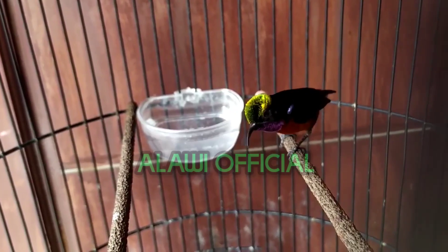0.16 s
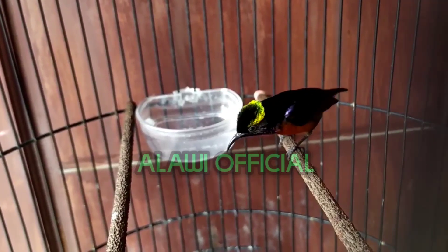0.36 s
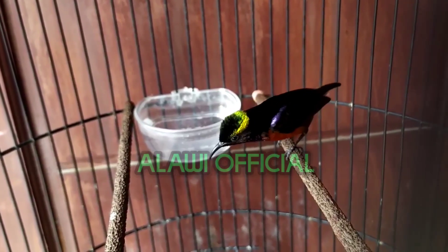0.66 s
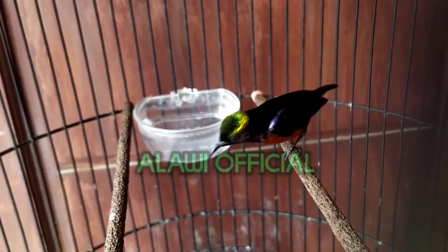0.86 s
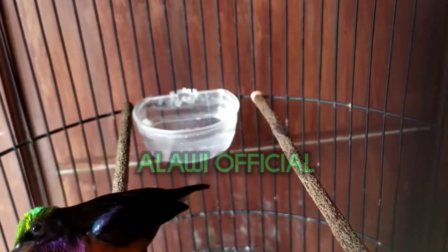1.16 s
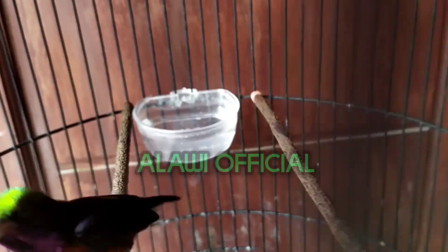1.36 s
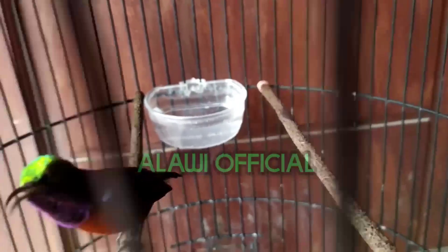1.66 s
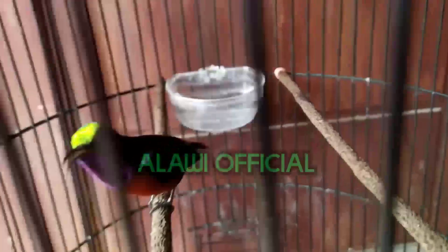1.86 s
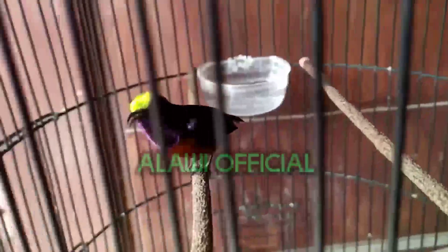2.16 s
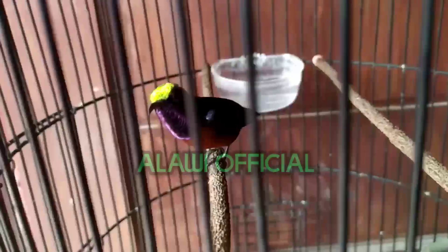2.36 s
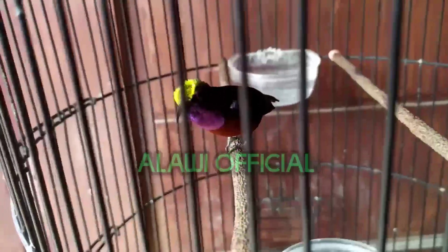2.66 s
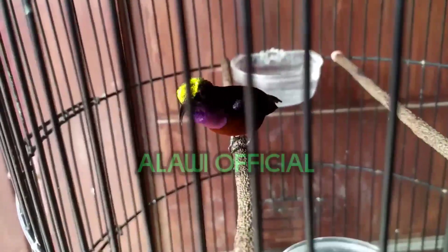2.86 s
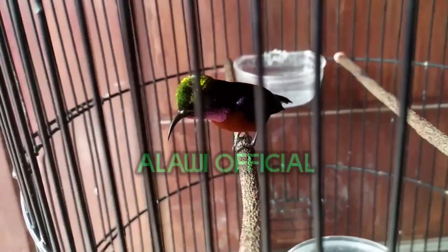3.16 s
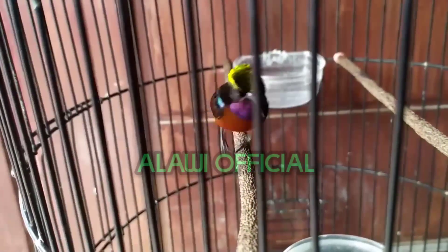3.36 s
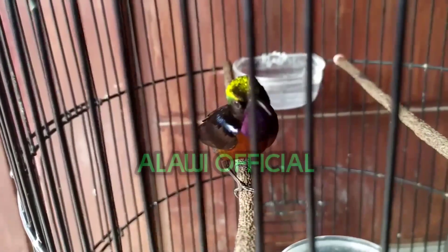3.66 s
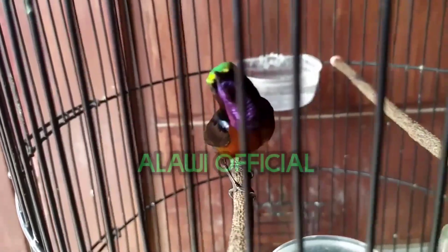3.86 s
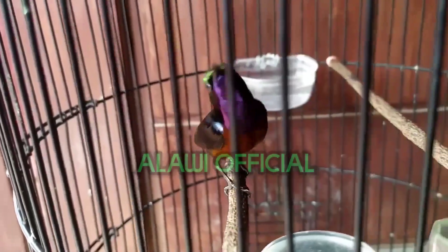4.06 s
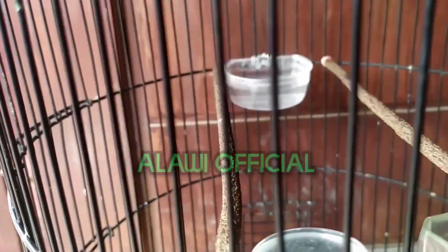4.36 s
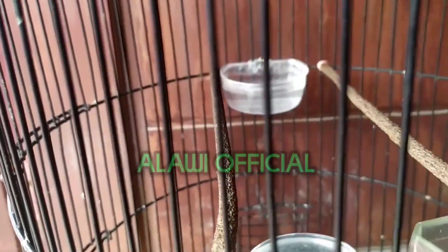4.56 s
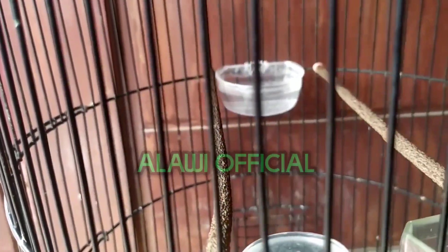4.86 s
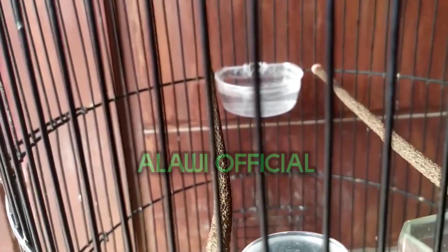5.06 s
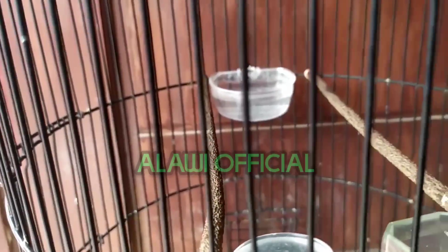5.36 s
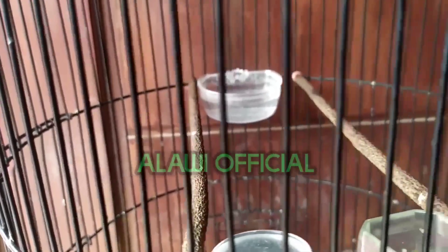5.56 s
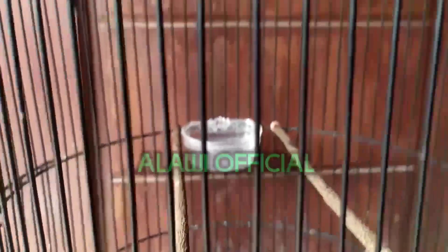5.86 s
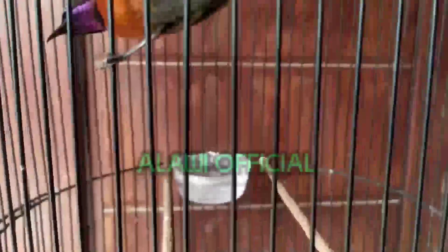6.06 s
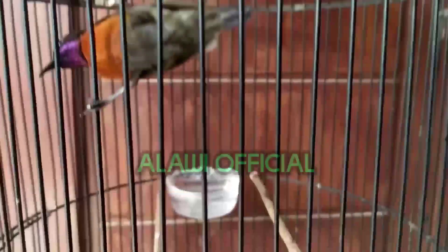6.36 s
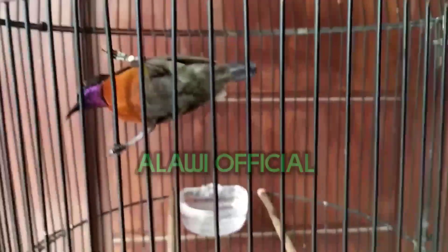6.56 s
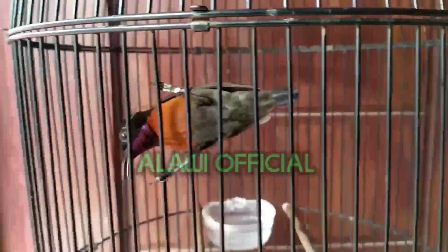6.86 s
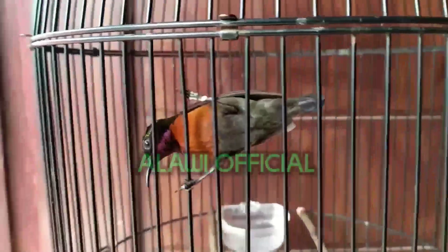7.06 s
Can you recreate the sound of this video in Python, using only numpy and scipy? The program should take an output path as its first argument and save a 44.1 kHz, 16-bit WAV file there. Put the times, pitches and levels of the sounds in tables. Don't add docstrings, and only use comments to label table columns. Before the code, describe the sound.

Sharp, overloaded bird chips and a rapid buzzy trill, then sparse single notes and soft perch taps over steady mains hum and rumble.

```python
import sys
import numpy as np
from scipy import signal
from scipy.io import wavfile
from scipy.ndimage import map_coordinates

SR = 44100
rng = np.random.default_rng(int(sys.argv[2]) if len(sys.argv) > 2 else 0)


def volts_from_db(level):
    exponent = np.asarray(level, float) / 20
    return 10 ** exponent


def materialize(psi):
    bounded = np.clip(np.atleast_2d(psi).T, -1, 1)
    quanta = np.round(bounded * 32767).astype(np.int16)
    wavfile.write(sys.argv[1], SR, quanta)


N = 318402
LEAD = SR // 4
TIME = (np.arange(N + LEAD) - LEAD) / SR

# (time [s], top pitch [Hz], leap up to it [Hz], level [dB])
CHIP_NOTES = [
    (-.12, 6180, 932, 3),
    (.379, 6795, 800, 7),
    (3.71, 6793, 1700, 6),
]
# (time [s], top pitch [Hz], leap up to it [Hz], level [dB])
RASP_NOTES = [
    (1.066, 6576, 960.4, 4.7),
    (6.961, 6185, 792.5, 3.5),
]
# (time [s], top pitch [Hz], level [dB])
TRILL_NOTES = [(1.162, 6148, 6), (1.230, 5990, 5.5), (1.294, 5990, 3), (1.357, 5918, 4), (1.420, 5833, 4),
               (1.481, 5860, 3.5), (1.549, 5922, 6), (1.614, 5960, 7), (1.683, 5827, 4), (1.753, 5993, 4),
               (1.820, 5980, 6), (1.889, 5890, 7), (1.958, 5915, 4.5), (2.025, 6024, 4), (2.100, 5996, 3.5),
               (2.169, 6050, 4), (2.245, 6025, 3)]
# (time [s], pitch [Hz], level [dB])
WHISTLE_CURVES = [
    [(2.995, 3925, -33), (3.028, 4202, 6), (3.05, 4247, 5.5), (3.088, 4326, 10), (3.111, 4244, 6.5),
     (3.122, 4140, -29)],
    [(4.974, 4360, -21), (4.99, 4120, 2.5), (5.002, 4287, 1), (5.024, 4180, 7), (5.062, 4298, 3.5),
     (5.074, 4200, 11), (5.1, 4158, 9), (5.106, 4010, -29)],
]
# (time [s], pitch [Hz], level [dB])
FAR_CALL_CURVE = [(5.09, 5420, -67), (5.12, 5350, -40), (5.15, 5300, -19), (5.165, 4940, -35),
                  (5.18, 4610, -17), (5.194, 4310, -51)]
# (time [s], level [dB])
HOARSENESS_CURVE = [(0, 1), (1.9, 0.5), (2.3, 4.5), (3.7, 4.5), (7, -1)]
# (time [s], left over right [dB], left lag [samples])
BIRD_POSITION = [(0, 0, 18), (.45, 15.5, 12.4), (1.08, 6, 13), (1.2, 8, 8.6), (1.35, 4.5, 8.66),
                 (1.75, 6.5, 9.76), (1.95, 5, 12.56), (2.3, 5.5, 14.35), (3.0, 11, 16.25), (3.15, 22, 17),
                 (3.73, 8, 10), (4.98, 10, 13.9), (5.1, 11, 13.8), (6.98, 6.5, 12.3)]
# (time [s], peak [dB], body pitch [Hz])
PERCH_KNOCKS = [
    (2.914, -30, 190),
    (4.282, -27.5, 95),
    (5.651, -29, 190),
    (6.604, -30, 170),
]
# (pitch [Hz], level [dB rms])
MAINS_LINES = [(60.2, -56), (120.6, -47.5), (241, -61.5), (300, -70.5), (361.5, -65.5), (482, -60.5)]
# (frequency [Hz], level [dB])
AIR_HISS = [(200, -19.5), (480, -16.5), (800, -14), (1200, -20), (2500, -19.5), (6900, -25.5),
            (9000, -15.5), (14500, -25)]
# (frequency [Hz], level [dB per Hz])
MACHINE_RUMBLE = [(26, -50), (45, -24.5), (64, 5.5), (92, -6.5), (125, -6), (200, -23)]
# (frequency [Hz], likeness [0-1])
PORT_LIKENESS = [(30, 1), (150, 0.62), (300, 0.74), (700, 0.11), (3000, .05), (16000, 0.017)]
# (time [s], level [dB])
MACHINE_NEARNESS = [(0, -2.5), (.9, 2), (4, -0.5), (5.3, -1), (7.22, -3.5)]
# (time [s], lift [dB])
HAND_SWAYS = [
    (2.78, 8),
    (3.3, 5),
    (3.92, 5),
]
# (time [s], level [dB])
CHATTER_LEVEL = [(.8, -57), (.93, -49), (1.05, -52), (1.3, -50), (4.55, -62), (4.75, -50.5), (4.95, -50.5),
                 (5.2, -77.5)]
# (time [s], level [dB rms])
MOTOR_LEVEL = [(0, -72), (4.5, -73), (6.4, -57), (7.22, -54.5)]


def unit_power(x):
    return x / np.sqrt(np.mean(x ** 2) + 1e-20)


def in_time(rows):
    s, *columns = np.transpose(rows)
    return [np.interp(TIME, s, column) for column in columns]


def at_hz(points, hz):
    point_hz, values = np.transpose(points)
    return np.interp(np.log(hz), np.log(point_hz), values)


def resonant_noise(hz, width_hz):
    r = np.exp(-np.pi * width_hz / SR)
    section = [0.96, 0.00027, -1, 1, -2 * r * np.cos(2 * np.pi * hz / SR), r * r]
    return unit_power(signal.sosfilt([section] * 2, rng.standard_normal(len(TIME))))


def drift(rate_hz):
    steps = rng.standard_normal(int(len(TIME) / SR * 40) + 2)
    return unit_power(np.interp(TIME * rate_hz, np.arange(len(steps)) - 10, steps))


def arches(notes, length_s, drop_hz, crest, rise_s, fall_s):
    hz = np.full(len(TIME), 5e3)
    gain, ragged = np.zeros((2, len(TIME)))
    for s, top_hz, leap_hz, db in notes:
        near = slice(*np.searchsorted(TIME, [s - .01, s + length_s + .005]))
        t = TIME[near] - s
        before = np.clip(1.3 - 1.3 * t / (crest * length_s), 0, 1)
        after = np.clip((t / length_s - crest) / (1 - crest), 0, 1.1)
        hz[near] = top_hz - leap_hz * before ** 2.7 - drop_hz * after ** 2.1
        rise_db = np.minimum(t / rise_s - 1, 0) * 15
        fall_db = np.minimum((length_s - t) / fall_s - 1, 0) * 13
        gain[near] = volts_from_db(db + (rise_db + fall_db))
        ragged[near] = np.minimum(before ** 6 + .6 * after ** 6, 1)
    return hz, gain, ragged


def syrinx(hz, gain, buzz, flaps, half_db, octave_db, beak_hz, twin_db=-60):
    wobble, flutter, waver = flaps
    phase = 2 * np.pi * np.cumsum(hz + 400 * buzz * wobble) / SR
    top_of_range = np.clip((hz - 6300) / 300, 0, 1)
    twin = volts_from_db(twin_db) * np.sin(2 * np.pi * 2600 * TIME) * top_of_range
    tone = gain * np.sin(phase) * (1 + buzz * flutter + twin)
    beak = signal.butter(3, beak_hz, "high", fs=SR, output="sos")
    tone = signal.sosfilt(beak, tone + 1e-18)
    half = volts_from_db(half_db) * np.sin(phase / 2) * (1 + .5 * waver)
    octave = volts_from_db(octave_db) * np.sin(2 * phase) * (.5 + waver)
    return tone + gain * (half + octave)


def membrane_flaps():
    return resonant_noise(349.3, 770), resonant_noise(500, 260), resonant_noise(120, 410)


def voice_break():
    return resonant_noise(6300, 3650)


def chips(flaps, hoarse_db):
    hz, gain, ragged = arches(CHIP_NOTES, .038, 2365, crest=.31, rise_s=.005, fall_s=.013)
    song = syrinx(hz, gain * (1 - .7 * ragged), 0.1 + .2 * ragged, flaps,
                  half_db=-50, octave_db=-28, beak_hz=3800, twin_db=hoarse_db - 13)
    return song, gain


def breath(hoarse_db, chip_gain, rasp_gain, trill_gain):
    hiss = resonant_noise(8330, 2330)
    sizzle = 0.059 * resonant_noise(12500, 5000) * volts_from_db(hoarse_db)
    throat = 0.13 * resonant_noise(2380, 1400)
    flow = volts_from_db(-20.0) * chip_gain + volts_from_db(-15.0) * rasp_gain + volts_from_db(-21) * trill_gain
    return volts_from_db(hoarse_db) * (hiss + sizzle + throat) * flow


def room(x):
    t60_s, tail_db, early_db = 0.54, -14.5, -14
    t = np.arange(SR // 2 + LEAD) / SR
    tail = rng.standard_normal((2, len(t))) * volts_from_db(-60 * t / t60_s) * np.clip(t / 0.004, 0, 1)
    tail *= volts_from_db(tail_db) / np.sqrt(np.mean(np.sum(tail ** 2, axis=1)))
    delays = (rng.uniform(.001, .007, 6) * SR).astype(int)
    echoes = np.array([0.23, -0.41, -0.21, 1.0, -1.29, 1.0])
    tail[[0, 0, 0, 1, 1, 1], delays] += volts_from_db(early_db) * echoes
    return signal.fftconvolve(x[None], tail, axes=1)[:, :len(x)]


def ports(x):
    pan_db, lag = in_time(BIRD_POSITION)
    left = map_coordinates(x, [np.arange(len(x)) - lag], order=2)
    return np.array([left, x * volts_from_db(-pan_db)])


def air_and_rumble(near_db):
    sway_db = sum(db * np.exp(-((TIME - s) / 0.14) ** 2) for s, db in HAND_SWAYS)
    edges = 25 * 2 ** np.arange(0, 9.4, .5)
    white = rng.standard_normal((2, 2, len(TIME)))
    out = 0
    for k, (low, high) in enumerate(zip(edges, edges[1:])):
        band = signal.butter(2, [low, high], "band", fs=SR, output="sos")
        mid, side = signal.sosfilt(band, white[k % 2])
        hz = np.sqrt(low * high)
        alike = np.clip(at_hz(PORT_LIKENESS, hz), 0, 1)
        if hz < 200:
            level_db = at_hz(MACHINE_RUMBLE, hz) + near_db + sway_db * (hz < 75)
        else:
            level_db = at_hz(AIR_HISS, hz)
        gain = volts_from_db(level_db + 1.33 * drift(11))
        out = out + gain * (np.sqrt(1 + alike) * mid + np.sqrt(1 - alike) * side * [[1], [-1]])
    return volts_from_db(-41.5) * unit_power(out) * volts_from_db([[.4], [-.4]])


def mains_hum(near_db):
    hum = 0
    for hz, db in MAINS_LINES:
        phase = 2 * np.pi * np.cumsum(hz + 0.00409 * hz * drift(3.6)) / SR
        hum = hum + volts_from_db(db + 3 + 0.4 * drift(11)) * np.sin(phase)
    return hum * volts_from_db(near_db)


def distant_chatter():
    level_db, = in_time(CHATTER_LEVEL)
    return volts_from_db(level_db) * np.array([resonant_noise(4800, 1240), resonant_noise(4740, 1300)])


def rasps(flaps):
    hz, gain, ragged = arches(RASP_NOTES, .042, 1653, crest=0.39, rise_s=0.0063, fall_s=0.011)
    song = syrinx(hz, gain * (1 - .5 * ragged), 0.75 + 0.526 * ragged, flaps,
                  half_db=-29.5, octave_db=-21.5, beak_hz=4000)
    return song + volts_from_db(-6.5) * gain * ragged * voice_break(), gain


def trill(flaps, hoarse_db):
    leap_hz = 1263
    notes = [(s, top_hz, leap_hz, db) for s, top_hz, db in TRILL_NOTES]
    hz, gain, ragged = arches(notes, .0275, 1020, crest=.47, rise_s=0.005, fall_s=0.005)
    song = syrinx(hz, gain * (1 - .5 * ragged), .25 + 0.43 * ragged, flaps,
                  half_db=-21.5 - 1.3 * hoarse_db, octave_db=-43.5, beak_hz=4180)
    return song + volts_from_db(-4.0) * gain * ragged * voice_break(), gain


def knocks():
    out, t = np.zeros(len(TIME)), np.arange(4000) / SR
    for s, db, hz in PERCH_KNOCKS:
        ring = np.sin(2 * np.pi * hz * t) * volts_from_db(-60 * t * hz / 5.7)
        push = 0.97 * np.sin(2 * np.pi * 620 * t) * volts_from_db(-60 * t / 0.014)
        out[round(s * SR) + LEAD:][:len(t)] += volts_from_db(db - 4.0) * (ring - push)
    return out


def whistle(notes, buzz, flaps, octave_db):
    hz, db = in_time(np.concatenate(notes))
    sounding = sum((TIME > rows[0][0]) & (TIME < rows[-1][0]) for rows in notes)
    return syrinx(hz, volts_from_db(db) * sounding, buzz, flaps, -56.5, octave_db, beak_hz=2916)


def far_call(flaps):
    return whistle([FAR_CALL_CURVE], .3, flaps, octave_db=-6.0)


def motor_drone():
    level_db, = in_time(MOTOR_LEVEL)
    return volts_from_db(level_db) * resonant_noise(320, 25)


def scene():
    flaps = membrane_flaps()
    hoarse_db, = in_time(HOARSENESS_CURVE)
    near_db, = in_time(MACHINE_NEARNESS)
    chip_song, chip_gain = chips(flaps, hoarse_db)
    rasp_song, rasp_gain = rasps(flaps)
    trill_song, trill_gain = trill(flaps, hoarse_db)
    song = chip_song + rasp_song + trill_song
    air = breath(hoarse_db, chip_gain, rasp_gain, trill_gain)
    held = whistle(WHISTLE_CURVES, .006, flaps, octave_db=-20.5)
    far = far_call(flaps)
    wall_band = signal.butter(2, [2960, 5530], "band", fs=SR, output="sos")
    dull = volts_from_db(2.5) * signal.sosfilt(wall_band, song)
    walls = room(dull + volts_from_db(4.0) * air + volts_from_db(-5) * held + volts_from_db(8) * far)
    shade = volts_from_db(.22 * in_time(BIRD_POSITION)[0] * [[1], [-1]])
    floor = air_and_rumble(near_db) + mains_hum(near_db) + distant_chatter() + motor_drone()
    return (ports(song + air + held) + shade * walls + 0.072 * far + knocks() + floor)[:, LEAD:]


def roll_off(x):
    return signal.sosfilt(signal.butter(12, 15300, fs=SR, output="sos"), x)


def record(dry):
    knee = 12
    hot = dry / (1 + np.abs(dry / 1.04) ** knee) ** (1 / knee)
    low = signal.sosfiltfilt(signal.butter(6, 7100, fs=SR, output="sos"), hot)
    treble = volts_from_db(-8) * (hot - low)
    return roll_off(np.clip(low + treble, -1, 1))


dry = scene()
out = record(dry)
materialize(out)
```